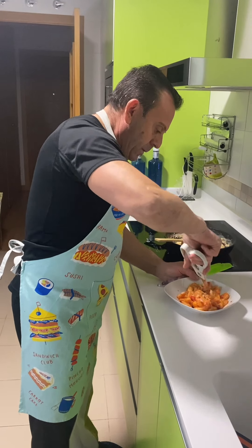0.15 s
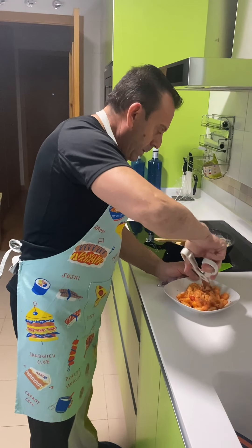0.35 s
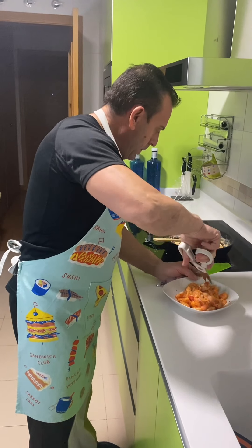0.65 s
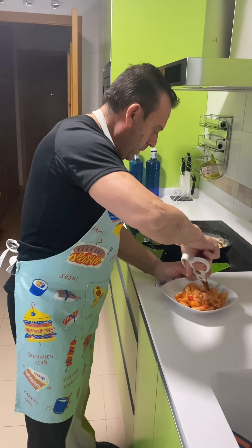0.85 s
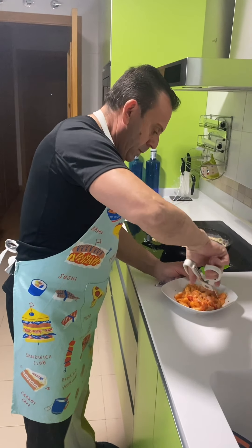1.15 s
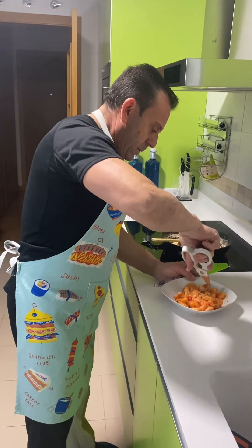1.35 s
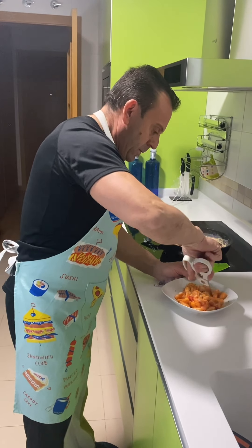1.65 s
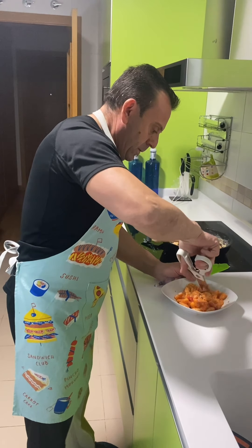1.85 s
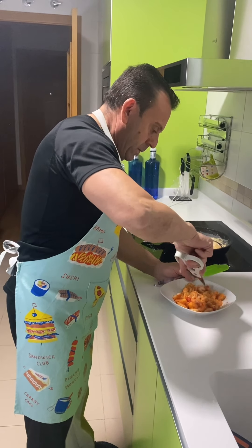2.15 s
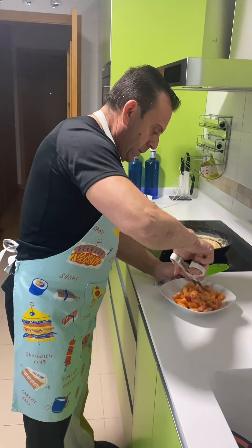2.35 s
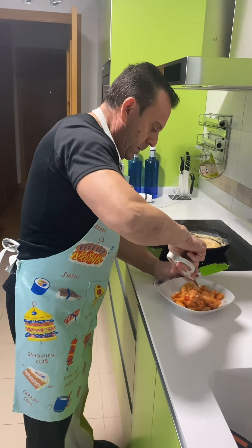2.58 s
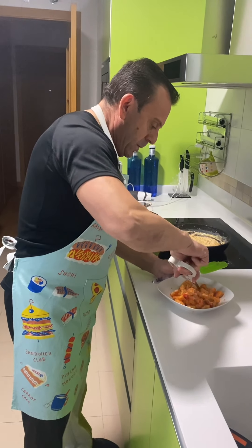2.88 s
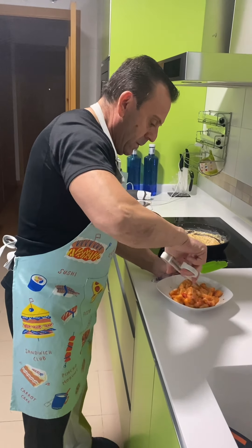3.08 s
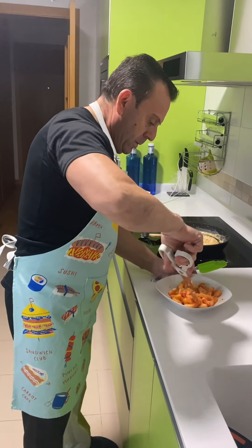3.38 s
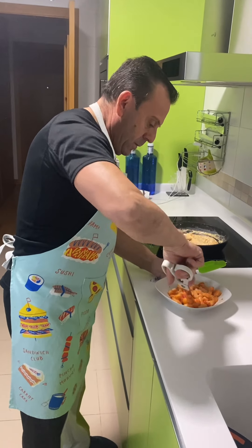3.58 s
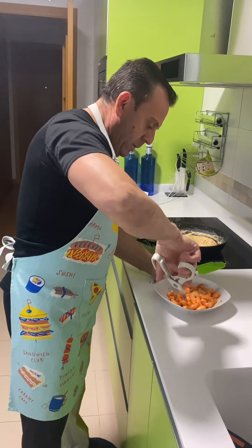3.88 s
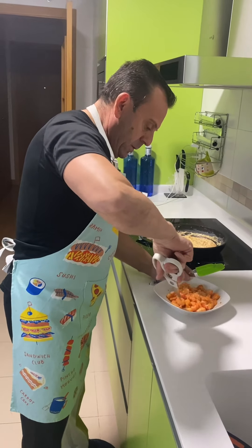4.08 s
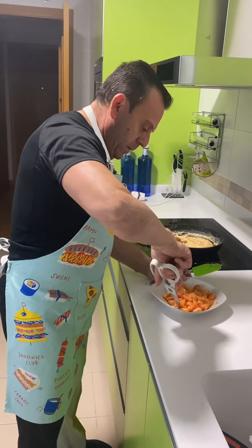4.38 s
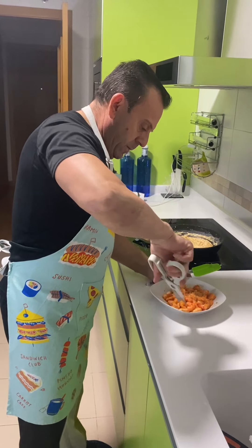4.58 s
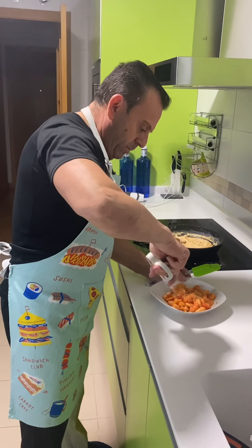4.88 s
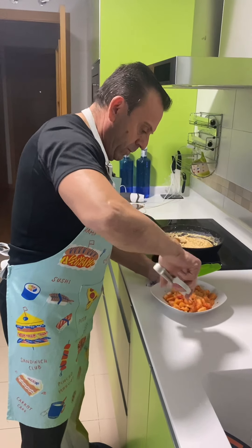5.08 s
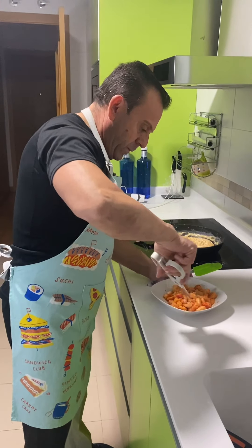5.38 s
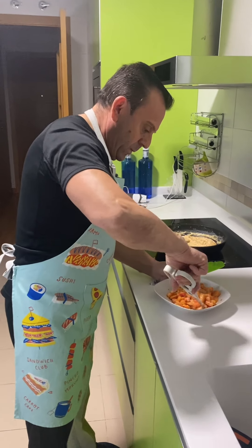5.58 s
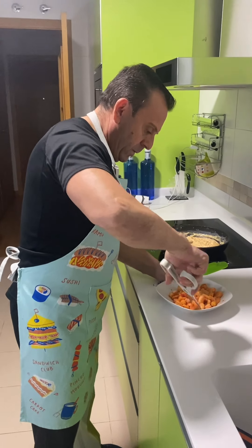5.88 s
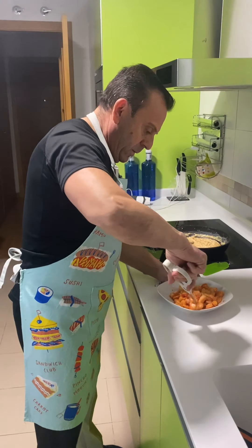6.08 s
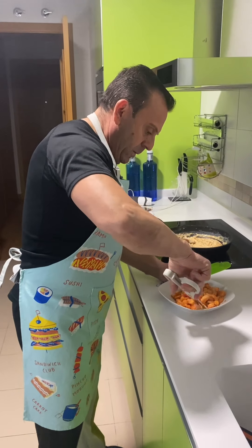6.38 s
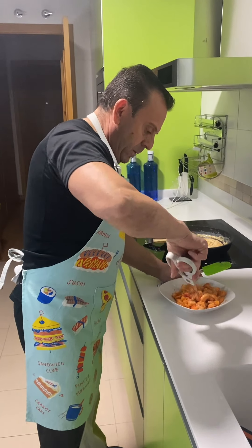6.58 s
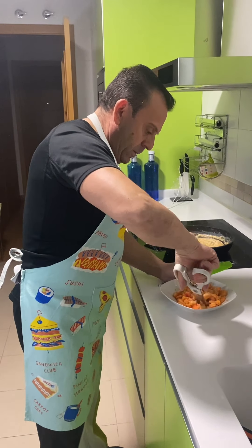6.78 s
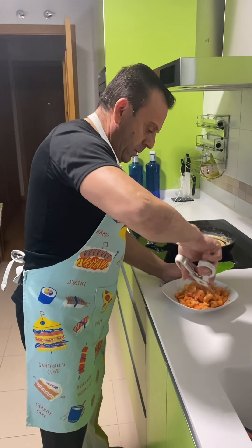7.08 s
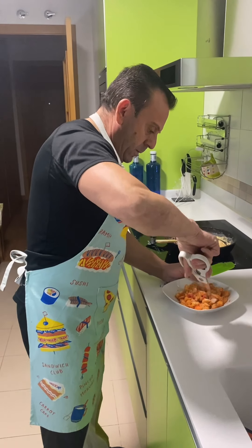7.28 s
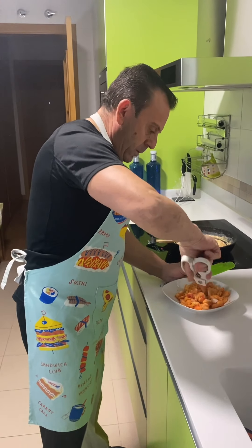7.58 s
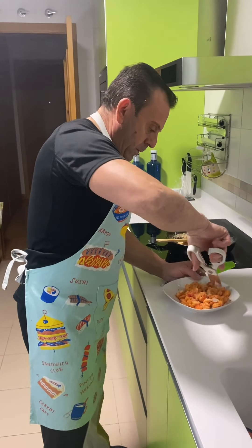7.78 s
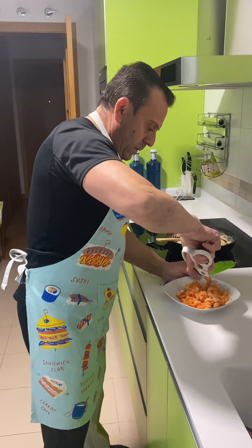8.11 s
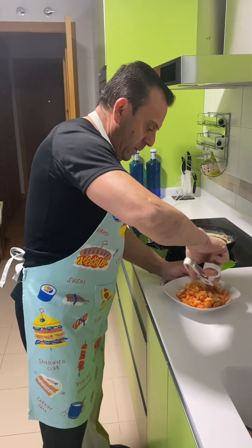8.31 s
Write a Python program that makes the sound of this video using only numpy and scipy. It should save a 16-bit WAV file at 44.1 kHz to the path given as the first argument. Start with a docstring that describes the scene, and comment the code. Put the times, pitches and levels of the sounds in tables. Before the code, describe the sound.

Kitchen scissors clack shut about two and a half times a second through wet prawns, tips knocking a ceramic bowl over a low hum.

```python
"""Kitchen scissors clack shut about two and a half times a second, snipping prawns in a ceramic bowl.
The blade tips often knock the bowl before the clack; the pivot and the wet flesh tick in between.
Short contacts ring the resonances of the handles and the bowl; noise makes the crunch and wet slide.
A mains hum and faint machine noise fill a small hard-walled kitchen with dense echoes, heard by
two close microphone ports that narrow the image."""
import sys
import numpy as np
from scipy import signal
from scipy.fft import rfft, irfft, next_fast_len
from scipy.io import wavfile

SR = 44100
rng = np.random.default_rng(int(sys.argv[2]) if len(sys.argv) > 2 else 0)


def wav_out(sig):
    """Save sig, one row per channel (or a flat mono array), as 16-bit PCM at SR to the path in sys.argv[1]."""
    wavfile.write(sys.argv[1], SR, np.round(np.clip(np.atleast_2d(sig).T, -1, 1) * 32767).astype(np.int16))


N = 372633   # samples


# handles clack shut: t/s, level/dB, treble over it/dB
SNIPS = [(0.0638, -26, -11), (0.4583, -22.5, -9), (0.846, -24.5, -16), (1.2155, -28.5, -11.5),
         (1.6288, -26.5, -25), (2.0334, -28, -12.5), (2.4483, -26.5, -11.5), (2.8468, -29, -13.5),
         (3.2121, -32.5, -11.5), (3.6015, -25.5, -10), (3.9827, -27, -9), (4.3741, -24, -8.5),
         (4.7496, -33, -11), (5.1792, -29, -15.5), (5.5998, -26, -12), (6.0206, -28.5, -11.5),
         (6.453, -29, -12.5), (6.8368, -27.5, -11.5), (7.181, -26.5, -12), (7.581, -28, -9.5),
         (7.9564, -26, -31), (8.3858, -26.5, -13)]
# resonances of the scissors: f/Hz, width/Hz (600 at least is used), relative level/dB
SCISSORS = [(2240, 500, 1.5), (2900, 1500, -3.5), (3620, 720, -6), (4240, 1100, -3), (4790, 406, 7),
            (6200, 1200, -1), (6950, 1500, 11.5), (9450, 890, 3.5), (12500, 3800, 1.5), (960, 460, 7)]
# borders between dull push, body, upper body and treble: f/Hz
PART_EDGES_HZ = [1500, 4600, 5500]
PUSH_DB = -18.5   # dull push under the clack
UPPER_DB, UPPER_SHARE = -2.5, 0.19   # upper body, and its share of the treble setting


def scissors():
    """The blades crunch through the flesh, then a short uneven contact rings the broad handle resonances."""
    s, db, treble_db = np.transpose(SNIPS)
    upper_db = db + UPPER_DB + UPPER_SHARE * treble_db
    parts_db = [db + PUSH_DB, db, upper_db, db + treble_db]
    contacts = [stutter(s, part_db, .003, count=4) for part_db in parts_db]
    out = swell(s, db - 10.5, t60=0.013)
    for k, (hz, width, mode_db) in enumerate(SCISSORS):
        contact = contacts[np.searchsorted(PART_EDGES_HZ, hz)]
        t60 = np.log(1000) / (np.pi * max(width, 600))   # a broad resonance dies fast
        rung = band(ring(contact, hz, t60), hz / 1.11, hz * 1.3)
        out += from_db(mode_db - 1.5) * rung * (-1) ** k
    return out


# tips knock the bowl: t/s, strength/dB, thud/dB (weight given to the counter),
# hardness/dB (bare ceramic is high, flesh low), crack over the strength/dB, favoured pitch of the spot f/Hz
KNOCKS = [(0.0, -45, -14, -26, .5, 700), (0.4135, -44.5, 0, -4.5, 23.5, 600),
          (0.7728, -31, -6.5, 6, 24.5, 2170), (1.1356, -40, -15, -31, 0, 635),
          (1.1614, -49, 7.5, -2.5, 29, 600), (1.5631, -30, -3.5, -1.5, 26, 2150),
          (1.9818, -42, -13.5, -24.5, 2, 680), (2.3754, -22, -19, -12, 9.5, 3310),
          (2.4005, -54.5, 7.5, -7, 16, 3250), (2.7816, -25.5, -10, -12, 16, 3300),
          (3.56, -57, 11, 3, 30, 3250), (4.2385, -49, 3, -4.5, 30, 2180), (4.644, -44, -2, -2, 30.5, 1420),
          (4.7002, -54, 2.5, -11, 15, 1300), (4.7327, -45.5, -6, -10, 14, 4800),
          (5.5037, -40.5, -4, -4, 24.5, 600), (5.597, -45, -7, -24, 5, 600),
          (6.3463, -44.5, -1, -6.5, 29.5, 1300), (6.761, -36.5, 4, -5.5, 28.5, 3300),
          (6.8, -60, 22, -7, 5, 200), (6.9497, -77, 26, 12, 39, 200), (7.478, -65, 5.5, -6, 25, 600),
          (7.896, -27.5, -7, -4.5, 20.5, 3220), (7.9389, -25.5, -19, -32, -9, 1980)]
# anchor pitches where a knock's spectrum is set: f/Hz
BLOW_HZ = [200, 600, 1300, 2200, 3250, 4800]
# what a knock gives near each anchor: level/dB, share of the thud, share of the hardness
BLOW = [(1.5, 0.95, -0.2), (3.5, 0.2, 0.059), (0.5, 0, -0.093), (5, 0, 0.55), (1, 0, 0.76),
        (2, 0.016, 1.25)]
# modes of the bowl and the counter under it: f/Hz, relative level/dB, t60/s
BOWL = [(63, -21.5, 0.076), (135, 1, 0.41), (194, 1, 0.14), (250.7, -0.5, 0.2), (294.5, -2, .12),
        (334.7, -4, 0.089), (403.5, -4.5, 0.036), (513.6, 1, 0.13), (588, 3.5, 0.069), (807.6, -2, 0.046),
        (1011, -2.5, 0.064), (1195.6, 5, 0.055), (1327, -6, 0.18), (1437, 3.5, 0.027), (1555, -9.5, 0.05),
        (2080, -7.5, 0.13), (2121, 3.5, 0.027), (2208, -1, 0.26), (2322, -4, 0.05), (3035, -7.5, 0.12),
        (3220, 3.5, 0.031), (3340, -4.5, 0.056), (4228, -4, 0.18), (4360, 0.5, 0.035), (5360, -2.5, 0.038),
        (5500, -9.5, 0.036)]
SPOT_DB, SPOT_OCTAVES = 4.5, 0.43   # lift and reach of the favoured pitch
NEAREST_DB, NEAREST_OCTAVES = 4.5, .06   # extra lift for modes right at the favoured pitch


def bowl():
    """Every knock rings the same modes, in shares set by where the tip lands, over a dull crunch and a crack."""
    s, strength_db, thud_db, hard_db, crack_db, spot_hz = np.transpose(KNOCKS)
    blow_db = []
    for hz, (db, low, high) in zip(BLOW_HZ, BLOW):
        spot_lift_db = SPOT_DB * np.exp(-(np.log2(hz / spot_hz) / SPOT_OCTAVES) ** 2)
        blow_db.append(strength_db + db + low * thud_db + high * hard_db + spot_lift_db)
    chance_db = rng.normal(0, 2.0, (len(s), len(BOWL)))
    # a dull blow lands on flesh, which weakens the ring
    bare_db = np.clip(0.38 * (blow_db[3] - blow_db[2]), -10, 2)

    crack = stutter(s, strength_db + crack_db, 0.0022, count=5)
    out = band(band(crack, 6700, 12000), 3700, 14200)
    out += swell(s, strength_db - 21, t60=.05)
    for hz, db in zip(BLOW_HZ, blow_db):   # the heap is pressed: unpitched, lows stronger and longer
        pressed_db = db + 12.5 - 0.45 * bare_db - 1.1 * np.log2(hz / 200)
        pressed = burst(s, pressed_db, t60=0.007 + 16 / hz)
        for _ in range(2):
            pressed = band(pressed, hz / 1.6, hz * 1.31)
        out += pressed
    for k, (hz, mode_db, t60) in enumerate(BOWL):
        share_db = np.array([np.interp(np.log(hz), np.log(BLOW_HZ), row) for row in np.transpose(blow_db)])
        share_db += NEAREST_DB * np.exp(-(np.log2(hz / spot_hz) / NEAREST_OCTAVES) ** 2)
        bare_ring_db = bare_db * (k > 7)   # only the modes above the lowest eight
        hit_db = share_db + chance_db[:, k] + bare_ring_db + mode_db - 9.0
        out += ring(clicks(s, hit_db), hz, t60) * (-1) ** k
    return out


# the pivot ticks as the blades reopen, about .18 s after a clack: t/s, level/dB
OPENS = [(0.2318, -36), (0.636, -34), (0.9977, -32), (1.4145, -40), (1.8234, -36), (2.2518, -38.5),
         (2.6578, -37), (3.0468, -32.5), (3.3862, -32), (3.7804, -29.5), (4.1791, -32), (4.572, -36),
         (4.9495, -34), (5.3718, -40.5), (5.8034, -34), (6.196, -30), (6.6363, -31.5), (6.992, -34),
         (7.3658, -29), (7.7613, -34), (8.1731, -31.5)]
# flesh and shell tick against the blades: t/s, level/dB, treble over it/dB
TICKS = [(0.0403, -34.5, -1), (0.7474, -45, -16), (1.1278, -42, -2), (1.3743, -38, -34),
         (1.5095, -37.5, -14), (1.95, -40.5, -10.5), (3.025, -33.5, -16.5), (3.1258, -39, -3),
         (3.181, -39.5, 5), (3.5089, -55, 10), (3.8921, -46, -17), (3.954, -37.5, 8), (4.557, -35, -22),
         (4.9227, -38, -3), (5.154, -32.5, -2), (5.332, -36, -27), (5.7787, -36, -17), (5.915, -44, -17),
         (6.001, -38, 8), (7.081, -41, -14), (8.3292, -43, -2), (8.349, -52.5, 13)]
OPEN_TREBLE_DB, OPEN_SLIDE_DB = -10.5, -23.5   # the pivot's bright edge and slide, over its level


def ticks():
    """Tiny clicks with a body and a bright edge; the pivot tick follows a short slide."""
    pivot = [(s, db, OPEN_TREBLE_DB) for s, db in OPENS]
    s, body_db, treble_db = np.transpose(pivot + TICKS)
    body = band(stutter(s, body_db, 0.0031, count=6), 1500, 7400)
    body = band(body, 1200, 8000)
    edge = band(stutter(s, body_db + treble_db, 0.0027, count=6), 5400, 11000)
    open_s, open_db = np.transpose(OPENS)
    slide = swell(open_s, open_db + OPEN_SLIDE_DB, t60=0.069)   # steel slides on steel first
    slide = signal.lfilter([1, -.8], [1], slide)   # brighter
    return slide + body + edge


# blades slide through the heap: t/s, body level/dB, treble level/dB (before the drag lift)
STIR = [(0, -94, -89), (1.5, -87, -83.5), (2.4, -84.5, -89), (3.1, -90, -85), (3.5, -87, -82.5),
        (4.1, -76, -83.5), (4.8, -83, -71), (5.4, -98, -87.5), (6.3, -75.5, -85), (6.75, -88, -82),
        (7.0, -78, -67.5), (7.6, -81, -73.5), (8.0, -84, -97), (8.45, -79, -85)]
# colour of the wet slide: f/Hz, relative level/dB
STIR_COLOUR = [(300, -15.5), (800, -4.5), (2500, -2.5), (5000, -5.5), (8000, -8.5), (12000, -5.5),
               (16000, -11.5)]
STIR_GRAINS_PER_S = 1100
DRAG_DB, DRAG_FADE_S, DRAG_TREBLE_SHARE = 7.5, 0.079, .3   # the heap is dragged after each clack


def stir():
    """Fine wet crackle on a sliding hiss, lifted by each cut and settling before the next."""
    s, body_db, treble_db = np.transpose(STIR)
    starts = rng.random(N) < STIR_GRAINS_PER_S / SR
    grains = starts * from_db(4.0 * np.minimum(rng.exponential(1, N), 4))
    crackle = rms_one(grains * rng.choice([-1, 1], N))
    sound = coloured(crackle + .7 * rng.standard_normal(N), STIR_COLOUR)
    body = signal.sosfilt(signal.butter(4, 6500, fs=SR, output="sos"), sound)
    treble = signal.sosfilt(signal.butter(4, 6500, "high", fs=SR, output="sos"), sound)
    t = np.arange(N) / SR
    drag_db = DRAG_DB * sum((t > cut) * np.exp(-np.abs(t - cut) / DRAG_FADE_S) for cut, *_ in SNIPS)
    body_gain = from_db(np.interp(t, s, body_db) + drag_db)
    treble_gain = from_db(np.interp(t, s, treble_db) + DRAG_TREBLE_SHARE * drag_db)
    return body_gain * body + treble_gain * treble


# decay of the room: f/Hz, t60/s
ROOM_T60 = [(150, 0.35), (400, 0.35), (1500, 0.34), (4000, 0.3), (9000, 0.27), (15000, 0.29)]
# colour of the echoes: f/Hz, relative level/dB
ROOM_COLOUR = [(100, 1.5), (400, 1), (3000, 0), (8000, 0.5), (15000, -9.5)]
ROOM_DB, FIRST_ECHO_S = -17.5, .003   # echo gain; time constant of the build-up


def kitchen(x):
    """Dense echoes: octave bands of noise, each dying at its own rate, other ones on each side."""
    t = np.arange(SR // 2) / SR
    white = rng.standard_normal((2, len(t)))
    edges = 70 * 2. ** np.arange(9)
    echo = 0
    for low, high in zip(edges, edges[1:]):
        part = signal.sosfilt(signal.butter(2, [low, high], "band", fs=SR, output="sos"), white)
        decay_db = -60 * t / at_hz(ROOM_T60, np.sqrt(low * high))
        echo = echo + part * from_db(at_hz(ROOM_COLOUR, low) + decay_db)
    echo = echo * (1 - np.exp(-t / FIRST_ECHO_S))   # the echoes build up
    return signal.fftconvolve(x[None], echo, axes=1)[:, :N]


# mains lines: f/Hz, rms level/dB (before the port colour), waver/dB
HUM = [(100.1, -50, 0.6), (348.5, -72.5, 3), (400.6, -72.5, 3), (51.6, -73.5, 8)]
# spectrum of the machine noise: f/Hz, relative level/dB per Hz
AIR = [(15, -51), (25, -39.5), (101, -7.5), (127, -14), (180, -20), (357, -20), (664, -27.5), (1150, -29.5),
       (1320, -35.5), (4660, -42), (6000, -61), (7800, -69), (13200, -120)]
AIR_DB = -61.5   # its rms before the port colour


def machines():
    """Mains lines that waver a little over broad noise."""
    t = np.arange(N) / SR
    lines = 0
    for hz, db, waver in HUM:
        level = np.sqrt(2) * from_db(db + waver * drift(4.1))
        lines = lines + level * np.sin(2 * np.pi * hz * t)
    return lines + from_db(AIR_DB) * coloured(rng.standard_normal((2, N)), AIR)


def stutter(times, db, spread_s, count):
    """A contact is a main click and a few weaker slips just after it."""
    late = rng.random((len(times), count))
    sign = rng.choice([-1, 1], (len(times), count))
    out = clicks(times, db)
    for k in range(count):
        at = np.round((times + spread_s * late[:, k]) * SR).astype(int)
        out[at] += from_db(db - 5.5 - 4.9 * late[:, k]) * sign[:, k]   # later slips are weaker
    return out


def swell(times, db, t60):
    """Flesh crunches or steel slides louder and louder until the contact: a decaying burst reversed."""
    return band(burst((N - 1) / SR - times, db, t60)[::-1], 570, 6000)


def clicks(times, db):
    """A unit train with one click a row, each at its own level."""
    out = np.full(N, 1e-18)
    at = np.round(times * SR).astype(int)
    out[np.clip(at, 0, N - 1)] = from_db(db)
    return out


def ring(x, hz, t60):
    """A unit click sets a decaying sine of height 1 ringing."""
    r, w = from_db(-60 / (t60 * SR)), 2 * np.pi * hz / SR
    return signal.lfilter([0, np.sin(w)], [1, -2 * r * np.cos(w), r * r], x)


def burst(times, db, t60):
    """Noise that starts at each click and dies away."""
    envelope = signal.lfilter([1], [1, -from_db(-60 / (t60 * SR))], clicks(times, db))
    return envelope * rng.standard_normal(N)


def band(x, low_hz, high_hz):
    """Gentle band-pass."""
    edges = np.clip([low_hz, high_hz], 20, .45 * SR)
    return signal.sosfilt(signal.butter(1, edges, "band", fs=SR, output="sos"), x)


def coloured(x, spectrum):
    """Shape a noise by a (f/Hz, level/dB) table; rms 1."""
    hz = np.fft.rfftfreq(N, 1 / SR)
    return rms_one(irfft(rfft(x) * from_db(at_hz(spectrum, hz)), N))


def drift(rate):
    """Slow random wander of rms 1: noise through a two-pole low-pass at rate Hz."""
    r = np.exp(-80 * np.pi * rate / SR)   # one step every 40 samples
    noise = rng.standard_normal(N // 40 + 2002)
    slow = signal.lfilter([1], [1, -2 * r, r * r], noise)[2000:]   # skip the run-in
    return np.interp(np.arange(N) / 40, np.arange(len(slow)), rms_one(slow))


def at_hz(points, hz):
    """Read a (f/Hz, value) table on a log axis."""
    table_hz, values = np.array(points).T
    return np.interp(np.log(hz + 1), np.log(table_hz), values)


def from_db(db):
    """Decibels to gain."""
    return 10 ** (np.asarray(db) / 20)


def rms_one(x):
    """Scale to unit rms."""
    return x / np.sqrt(np.mean(x ** 2) + 1e-20)


def scene():
    """Work at the counter, its echoes and the background."""
    work = scissors() + bowl() + ticks() + stir()
    return work + from_db(ROOM_DB) * kitchen(work) + machines()


# colour of both ports: f/Hz, level/dB
MIC = [(20, -14.5), (60, 2), (9000, 4.5), (13000, -5.5), (16000, -5)]
# stereo width: f/Hz, side level/dB
WIDTH = [(100, -47), (300, -11), (700, -3.5), (3500, -3.5), (5500, -7.5), (7000, -26.5), (10000, -16.5),
         (16000, -14.5)]
# the right port hears late: f/Hz, phase lag/half turns
PORT_LAG = [(0, 0), (1500, .07), (3000, .45), (5000, .06), (6300, .65), (7000, .96), (7700, 1.04),
            (10000, 1.97), (11500, 2.03), (12700, 2.95), (14200, 3.03), (16000, 4)]
CUTOFF_HZ = 16990   # 70 dB down from here up


def record(dry):
    """Close ports narrow the image and turn the phase of one side; the top is cut."""
    size = next_fast_len(N)
    hz = np.fft.rfftfreq(size, 1 / SR)
    left, right = rfft(dry, size) * from_db(at_hz(MIC, hz))
    mid = (left + right) / 2
    side = (left - right) / 2 * from_db(at_hz(WIDTH, hz))
    lag = np.pi * np.interp(hz, *np.transpose(PORT_LAG))
    right_late = (mid - side) * np.exp(-1j * lag)
    ports = irfft(np.array([mid + side, right_late]), size)[:, :N]
    return signal.sosfilt(signal.cheby2(12, 70, CUTOFF_HZ, fs=SR, output="sos"), ports)


dry = scene()
out = record(dry)
wav_out(out)
```